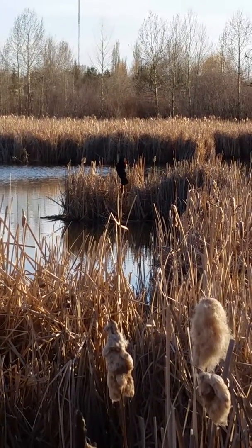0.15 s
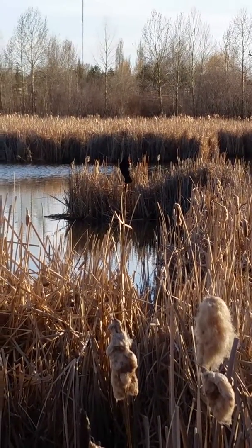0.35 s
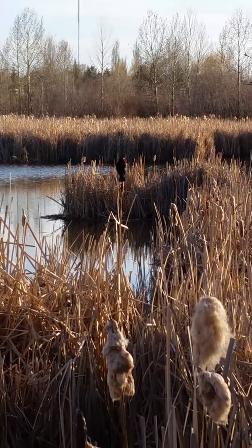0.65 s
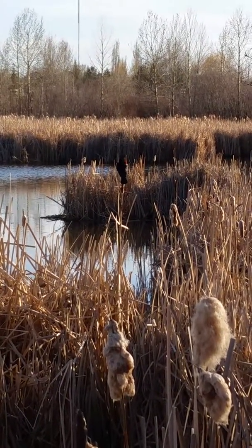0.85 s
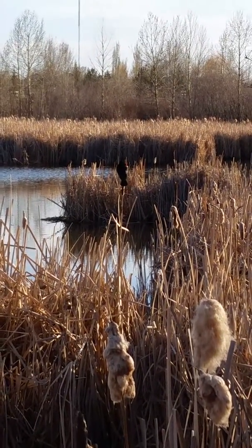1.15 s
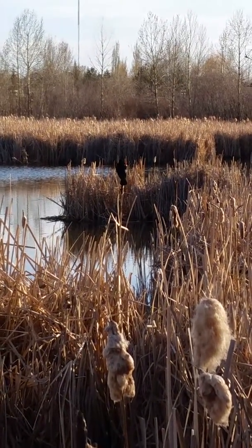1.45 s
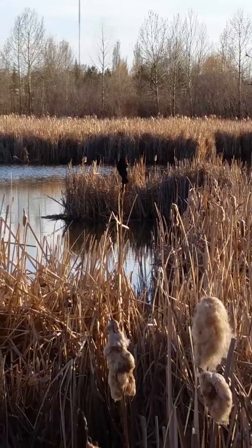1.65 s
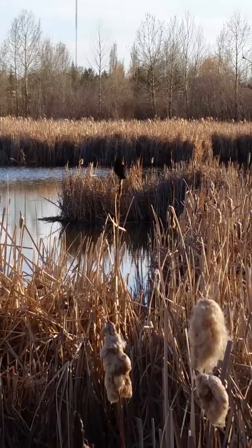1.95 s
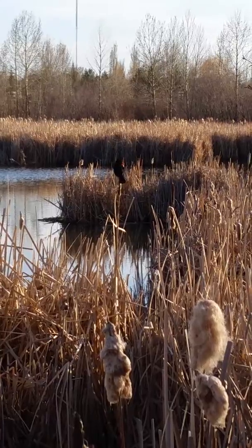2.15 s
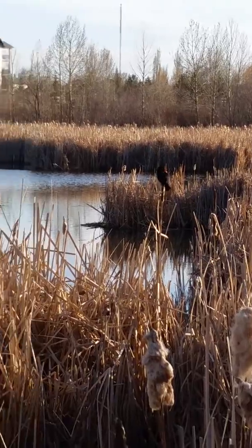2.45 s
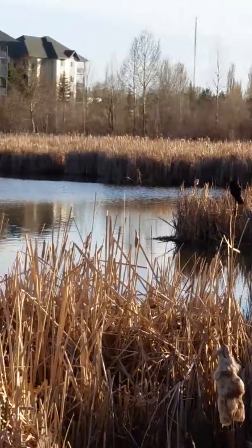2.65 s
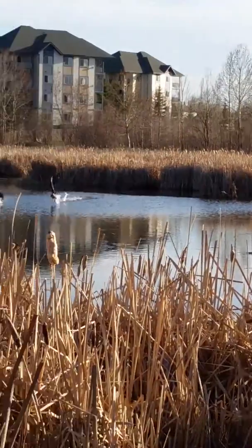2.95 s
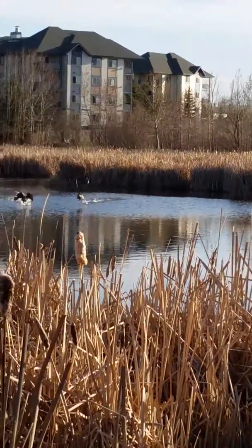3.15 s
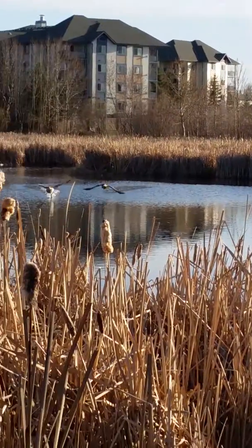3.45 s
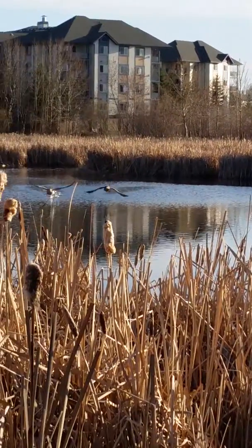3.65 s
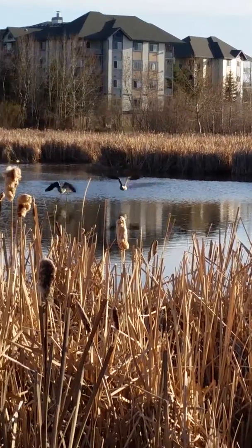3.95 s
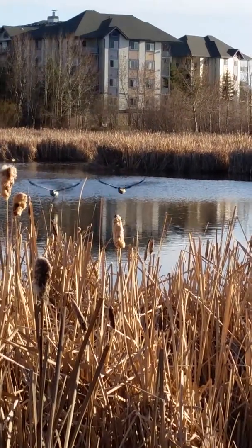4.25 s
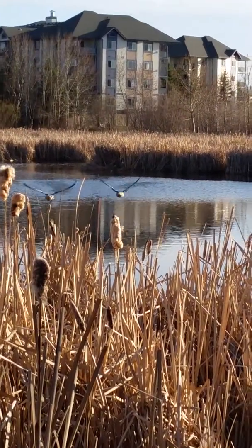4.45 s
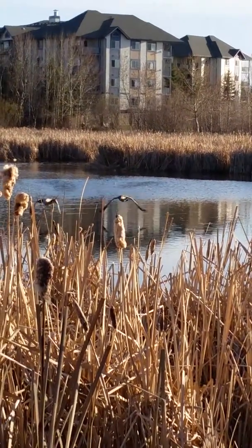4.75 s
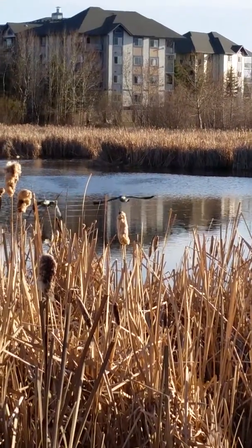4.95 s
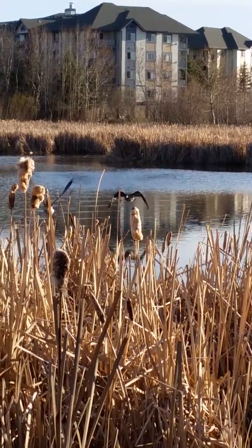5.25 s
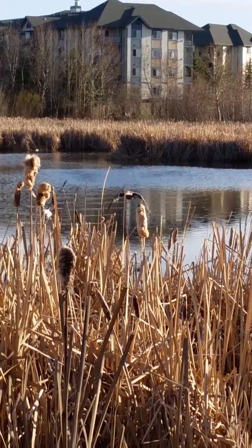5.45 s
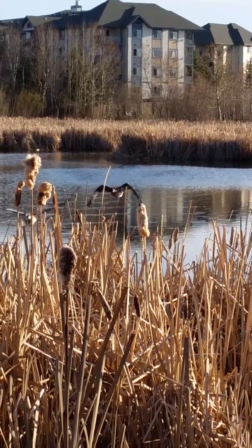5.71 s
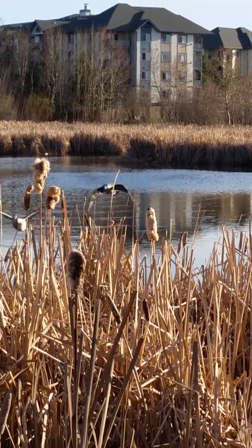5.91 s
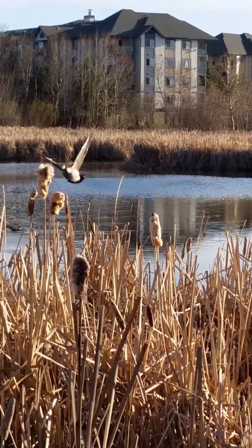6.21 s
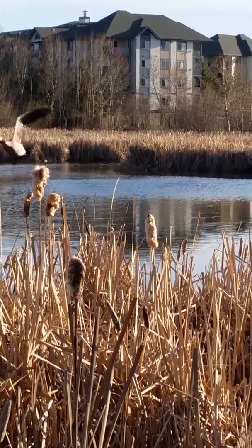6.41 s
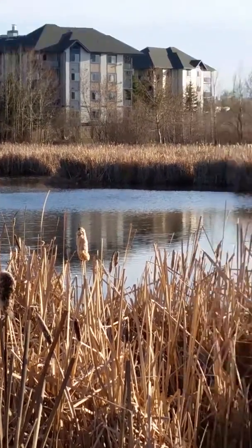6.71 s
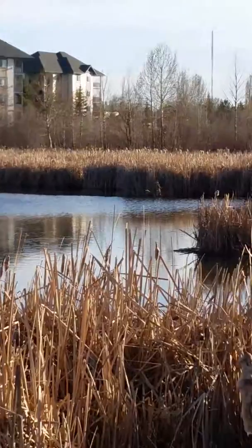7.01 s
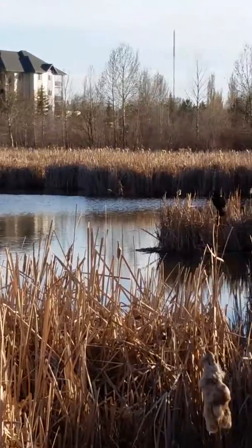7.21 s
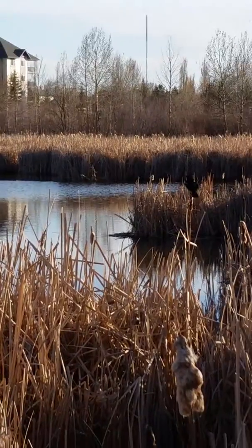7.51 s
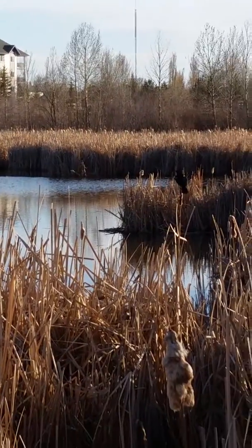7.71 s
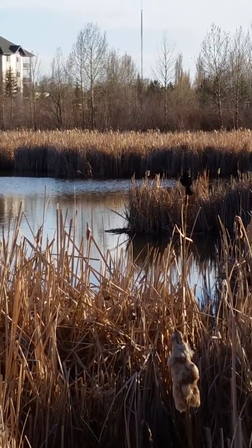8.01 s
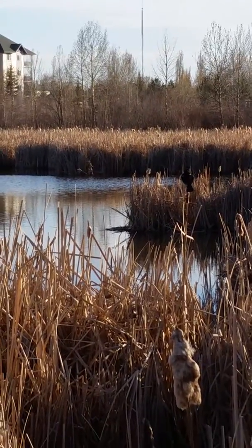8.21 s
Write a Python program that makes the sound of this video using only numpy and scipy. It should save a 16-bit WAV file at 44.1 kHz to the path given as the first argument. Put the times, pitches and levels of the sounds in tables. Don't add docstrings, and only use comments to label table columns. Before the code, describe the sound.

Outdoors at a reed-fringed pond, a low far-off traffic drone runs throughout. One goose honks steadily, faint at first, each later call often led by a rising chirp and rough croak. Its mate fills the gaps with short low grunts. The pair flies close past the microphone near the end, honks turning loud and brassy, then duller, with soft dull echoes from reeds and walls.

```python
import sys
import numpy as np
from scipy import signal
from scipy.fft import rfft, irfft, next_fast_len
from scipy.io import wavfile
from scipy.ndimage import map_coordinates

SR = 44100
rng = np.random.default_rng(int(sys.argv[2]) if len(sys.argv) > 2 else 0)


def magnitude_from_level(level_db):
    exponent = np.asarray(level_db, float) / 20
    return 10 ** exponent


def generate_wav(signal):
    frames = np.transpose(np.atleast_2d(signal))
    scaled = np.clip(frames, -1, 1) * 32767
    pcm = np.round(scaled).astype(np.int16)
    wavfile.write(sys.argv[1], SR, pcm)


N = 369116

# t/s, swell level/dB, engine load/dB
TRAFFIC = [(0, -48.5, -6), (.6, -49.5, -2), (1.44, -51, -16), (1.75, -46, 3.5), (2.2, -48, 0.5),
           (3.03, -47, -8), (3.47, -46.5, -17), (4.15, -46.5, 2.5), (4.73, -45.5, 5.5), (5.8, -44, 7),
           (6.62, -43, 8), (7.0, -41.5, 6.5), (7.74, -43, 9), (8.37, -43.5, 14.5)]
# f/Hz, level/dB per Hz
RUMBLE = [(12, -53), (20, -3), (76, 2), (172, -11), (229, -8), (317, -15.5), (450, -21.5), (580, -47),
          (990, -120)]
# f/Hz, level/dB per Hz
HISS = [(300, -0.5), (476, -8.5), (680, -7), (940, -11.5), (1370, -9), (1750, -20), (2300, -21.5),
        (3000, -17), (3700, -19.5), (4300, -29.5), (5000, -36), (6500, -38), (8200, -49), (10200, -49),
        (12000, -36.5), (16000, -36.5)]
# f/Hz, width/Hz, level/dB
DRONES = [(52.5, 7.62, -13), (95.5, 6.5, -11.5), (131.1, 6.32, -13.5)]
# f/Hz, likeness/1
LIKENESS = [(60, 0.99), (290, 0.86), (640, 0.5), (1410, 0.44), (3100, 0.039), (15000, .02)]
# f/Hz, left over right/dB
LEAN = [(60, -1), (300, -1.5), (1000, -0.5), (2400, 8), (4400, 4), (15000, 4)]
TYRES_DB, TYRES_FOLLOW = -43, 0.94
MID_AIR_FOLLOWS, AIR_FOLLOWS = 0.4, 0.65

# t/s, length/s, f/Hz, effort level/dB, sag/(Hz per s)
HONKS = [(0.145, 0.094, 670, -48, 153), (0.559, 0.072, 682.5, -48, 311), (1.019, 0.095, 676.5, -48, 47),
         (1.444, 0.11, 678, -49, 59), (1.763, 0.13, 711.7, -46.5, -300), (2.12, 0.09, 751.5, -42, 31),
         (2.501, .12, 757.6, -39.5, 130), (2.906, 0.13, 759, -41, 252), (3.311, 0.12, 755, -39, 212),
         (3.748, 0.12, 772, -40.5, 181), (4.185, 0.12, 788, -39, 162), (4.604, 0.12, 797, -39, 447),
         (5.032, 0.16, 806, -45, 667), (5.561, .158, 776.7, -46.5, 78), (6.052, 0.16, 799, -41, 562),
         (6.581, 0.16, 784.6, -27.5, 291.5), (7.039, 0.14, 765.6, -23.5, -43),
         (7.483, .13, 751, -25.5, 120), (8.121, 0.08, 713, -35, 300), (8.246, 0.059, 712, -39.5, 254)]
# onset f/Hz, late lift f/Hz, share of pitch lost at the end/1
BENDS = [(-39, 2.6, 0.17), (-42, 2.2, 0.14), (-30, 2.3, 0.22), (-41, 1.6, 0.19), (-14, 5, 0.24),
         (-23, 12.7, 0.12), (19, 2.2, 0.12), (16.5, 5.6, 0.17), (20.5, 2.7, 0.23), (15, 2.5, 0.14),
         (24.5, 3.3, 0.11), (3, 4.8, 0.126), (-10, 57, 0.15), (29.5, 1.5, 0.071), (25.5, 48, 0.09),
         (33, 22, 0.051), (-10.5, 3.5, 0.22), (10, 16.2, .2), (-28, 5.3, 0.18), (16, 2.5, 0.22)]
# first overtone/dB, second/dB, 3-8 kHz/dB, above 8 kHz/dB
HEAD_TURN = [(1, 6, -3.5, -37), (0, 6, 0, -28), (-1, 4.5, -1.5, -26), (0, 5, -1.5, -50),
             (-2.5, 2, -4.5, -30), (-9.5, -1.5, -3.5, -11), (-8, -2.5, -4.5, -9), (-6.5, -2.5, -4.5, -13),
             (-7, -2.5, -8, -15.5), (-9, -1, -13, -7), (-4.5, -1, -3, -3), (-3.5, -2, -2, -2),
             (2.5, 4.5, 5, 0.5), (5, -0.5, 5, 6), (-11.5, 7.5, -2, -3.5), (-14, -3, -0.5, 5.5),
             (-6, -5.5, 2.5, 0.5), (-4.5, -1.5, 3.5, 6.5), (-6.5, 3.5, -25, -40), (0.5, -0.5, -2.5, -33)]
# fade of the top/(dB per s), hiss level where the voice breaks/dB
TOP_FADES = [(-5, -32), (-3, -27), (-5, -25), (0, -21), (-2, -24), (-8, -20), (-10, -22), (-3, -23),
             (-4, -18), (-5, -24), (-4, -27), (2, -24), (4, -20), (-29, -19), (-23.5, -16), (-34, -13.5),
             (-17.5, -18), (-47, -8), (-18, -26), (-12, -29)]
# third overtone/dB, fourth/dB, fifth/dB, near 8.5 kHz/dB
OVERTONE_TURN = [(1.5, -3, 1, 6), (0.5, -5, 0, 3), (0.5, 0.1, -4, 5), (1, -2, -1.5, 0.1),
                 (-0.5, 8, -2, 0.1), (-1, 8, 1, 0.1), (-2, 3, 1, 0.1), (-1, 3, 0, 1), (-2, 3, 2, 0.1),
                 (-1, 5, 1, 2), (0, -6, -18, 3), (-4, -18, -14, -1), (-1, -17, -8, -6), (-3, -5, 2, 0),
                 (-7, -3, -1.5, -3), (-1.8, -4, -2.5, -5.5), (-2.2, -2.5, -7.5, 9), (2, 0.5, -0.2, -4),
                 (1, -1, 2, 2), (0, 2, 14, -6)]
UPPER_TILT_DB = [1, 3, 5, 4, -2, -3, 2, -2.5, -1, -3, 9, 7, 1.5, -13, -6.5, -1.5, -4.5, -5, -6, -7]
# f/Hz,
# level/dB
HONK_COLOUR = [(650, 15), (1500, 11), (1900, 7.5), (2300, 4), (3080, -5.5), (3850, 3.5), (4620, 1.5),
               (5400, 0), (6200, -3.5), (7700, -15.5), (9500, -18), (11100, -11.5), (12500, -1),
               (14500, -5.5), (15800, -8)]
HONK_ATTACK_S, HONK_RELEASE_S = 0.016, 0.0346
ONSET_DB, HOLD_FADE_DB_PER_S, END_DB = -6.5, -20.5, -6.5
SETTLE_S, LIFT_BEFORE_END_S, LIFT_WIDTH_S = 0.014, 0.0445, 0.018
TOP_LATE_S, TOP_LATE_DB = 0.015, -27
WOBBLE, HONK_SHIMMER_DB = 0.0037, 1.2
HONK_AIR_DB, HONK_GRAIN_DB = -31, -44
PASSED_S, PASSED_AIR_DB = 7.4, 13.5
FLARE_DB = 19.5

# t/s, length/s, start level/dB, end level/dB
CROAKS = [(0.502, 0.076, -56, -44.5), (2.088, 0.051, -60.5, -42), (2.471, 0.045, -46.5, -48),
          (2.862, 0.065, -57, -43.5), (3.277, 0.081, -49, -48), (3.709, 0.072, -48.5, -44),
          (4.58, 0.03, -58, -36.5), (4.997, 0.061, -57, -44), (5.51, 0.072, -69, -40),
          (5.99, 0.078, -55, -37), (6.539, 0.06, -53, -28.5), (6.993, 0.066, -43, -29),
          (7.453, 0.059, -29.5, -31), (8.048, 0.092, -38, -28)]
# t/s, length/s, start level/dB, end level/dB
LAST_CROAK = [
    (8.175, .092, -31, -36),
]
# f/Hz, level/dB
CROAK_THROAT = [(177, 1.5), (330, -24), (520, 2), (780, -3.5), (1060, 2), (1330, 2.5), (1800, -13),
                (2500, -18.5), (4000, -26), (7000, -71.5), (9500, -85), (13000, -75)]
# f/Hz, level/dB
LAST_CROAK_THROAT = [(250, -36), (500, -5), (750, -4), (1000, -0.5), (1250, -6), (2000, -17), (4000, -23.5),
                     (9000, -98)]
# t/s, length/s, start f/Hz, end f/Hz, level/dB
LOW_NOTES = [
    (5.525, 0.061, 496, 555, -42.5),
    (5.99, 0.076, 559, 545, -50.5),
    (6.54, 0.059, 508, 520, -38.5),
    (8.102, 0.054, 490, 493, -35),
    (8.172, 0.097, 496.6, 511, -28),
]
# f/Hz, level/dB
LOW_NOTE_THROAT = [(500, -2.5), (1000, -12)]
# t/s, length/s, peak level/dB, scoop/s
CHIRPS = [(0.97, 0.069, -49, 0.035), (2.075, 0.042, -38.5, 0.02), (2.453, 0.087, -40.5, 0.036),
          (2.841, 0.13, -39, 0.044), (3.246, 0.099, -36.5, 0.054), (3.694, 0.047, -39.5, 0.033),
          (4.136, 0.059, -35, 0.055), (4.555, 0.065, -33.5, 0.04), (4.983, 0.087, -34, 0.041),
          (5.517, 0.027, -37.5, 0.049), (5.985, 0.027, -47, 0.05), (6.528, 0.028, -25.5, 0.043),
          (6.974, 0.073, -32, 0.046), (7.429, 0.049, -21.5, 0.074), (8.019, 0.085, -25.5, 0.063)]
# f/Hz, level/dB
CHIRP_THROAT = [(700, -1), (1390, -3), (1540, -11.5), (2050, -14.5), (4000, -72.5)]

# t/s, length/s, f/Hz, level/dB
GRUNTS = [(.165, 0.047, 170.2, -55), (0.79, .048, 173.4, -51), (1.108, 0.044, 172, -50),
          (1.319, 0.041, 173.2, -50.5), (1.542, 0.035, 175.4, -50), (1.707, 0.063, 179.4, -49.5),
          (1.924, 0.043, 191.5, -46), (2.126, 0.046, 194.2, -53), (2.346, 0.041, 196.6, -50),
          (2.551, 0.078, 201.2, -50.5), (2.945, 0.054, 198.2, -49), (3.35, 0.058, 204, -48),
          (3.531, 0.071, 202.3, -48), (3.765, 0.04, 210.4, -45), (3.936, 0.0553, 204.6, -48),
          (4.13, 0.075, 205.6, -46.5), (4.358, 0.08, 205.6, -47), (4.62, 0.051, 210.4, -47),
          (4.865, 0.05, 208.8, -46), (5.124, 0.0654, 204.6, -47), (5.348, 0.053, 205.6, -47),
          (5.667, 0.088, 206.7, -48), (5.852, 0.055, 208.8, -46), (6.129, 0.075, 211.3, -43.5),
          (6.361, 0.061, 209.6, -43), (6.691, 0.083, 207.2, -35.5), (6.925, 0.069, 205, -38.5),
          (7.187, 0.068, 206.8, -37), (7.402, 0.086, 202.5, -34.5)]
# t/s, length/s, f/Hz, level/dB
HIGH_GRUNTS = [
    (2.739, 0.041, 273.5, -55.5),
    (3.127, 0.045, 276.5, -51),
    (7.81, 0.053, 269.2, -39.5),
]
# third overtone/dB, fourth/dB, fifth and sixth/dB
GRUNT_TURN = [(0, -4, -1), (-7, 6.5, -2.5), (-9, 6, -7), (-7, 4, -4), (-4, 0.5, -6), (-5, 4, -3),
              (-7, 3.5, -12), (-3, -5, -6), (-5, 5, -10), (-1.5, 2.5, -3), (-5.5, 2, -1.5),
              (-1.5, -0.5, -4), (-3, 2, -3), (.3, 5.5, -4), (-4, 2, -5), (-1.5, -1, -2), (-1.5, 2, -5),
              (2, 4, 2), (-1, 4, 1), (1, 3, -8), (3.5, 6, -10), (1, 0, -18), (2, -10, -19), (-8, 6.5, 3),
              (-3, 2, 1), (-4, 8, -4), (-1, 2, 1.5), (-6.5, 3.7, 2.5), (-6, 3, 6), (3, -1, 2), (3, -9, -1),
              (4.3, -1, 2.8)]
# overtone number/1, level/dB
GRUNT_THROAT = [(1, -5), (2, -30.5), (3, 3.5), (4, 4), (5, -4.5), (6, -4), (7, 4.5), (8, 7), (9, -12.5),
                (12, -14.5), (20, -26.5), (26, -32.5), (33, -38), (45, -53), (63, -36.5)]
# overtone number/1, level/dB
HIGH_GRUNT_THROAT = [(1, -56), (2, 0), (3, -2), (4, -3), (5, 5.5), (6, 0), (7, -16), (14, -25), (30, -59)]
# t/s, middle overtones/dB, top/dB, left over right/dB
GRUNT_LEAN = [(0, 5, 0, -2), (1.5, 1, -5, -3), (2.2, -4, -7, -3), (4.0, -6, -10, -1.5), (5.35, -7, -2, -2),
              (5.7, -5.5, 0.5, -1), (5.85, 1, -5, -1), (6.15, -6.5, -2.5, -1.5), (6.4, -6.5, -10.5, -3),
              (6.72, -2.5, 8, -4.5), (6.95, -5, -2.5, -2), (7.2, -8.5, 2.5, -3), (7.42, -7, 0.5, -4),
              (8.37, -9, 1, -4)]
GRUNT_DULLING_DB = -2
GRUNT_SWELL_S = 0.022

# t/s, right port lag/ms, left over right/dB, treble carried/dB
FLIGHT = [(0, 0.016, 2.5, -12), (4, 0.0011, 1.5, -17), (6.3, 0.022, 1, 3.5), (6.6, 0.018, 4, -5.5),
          (7.05, 0.053, 2, -9), (7.5, 0.15, 2, -24), (8.37, 0.2, -4, -45)]
# f/Hz, left over right/dB
PORTS = [(700, 1.5), (1500, 6.5), (2300, -10), (3100, 11), (4000, -33.5), (6000, -27), (7200, -12),
         (9000, 7), (11000, 17), (15000, -5)]
# delay/s, level/dB
ECHOES = [(0.019, -13), (.062, -23), (0.101, -23), (0.136, -17.5), (.215, -31.5), (.31, -34.5)]
# t/s, level/dB
ECHO_SHARE = [(0, 0.5), (2, 1), (6, -.5), (7.5, -5), (8.37, -2.5)]
ECHO_THIN_HZ, ECHO_BRIGHT_DB = 900, -15
ECHO_FLUTTER_DB = 3.5

# t/s, peak level/dB
TICKS = [(1.567, -60), (6.535, -59), (6.55, -62.5), (6.568, -62), (6.747, -31), (6.761, -30), (6.778, -33),
         (6.968, -60), (6.985, -67)]
# t/s, level/dB
CHIPS = [
    (3.012, -52.5),
    (5.321, -59),
]
# delay/s, length/s, start f/Hz, end f/Hz, level/dB
CHIP_NOTES = [
    (0, 0.0077, 4020, 3800, 4.5),
    (.006, .009, 3200, 3320, 6),
    (.014, .006, 5600, 4600, 0.5),
]
# t/s, level/dB
IDLE_NOTE = [
    (2.2, -80),
    (2.45, -57),
    (3.15, -57),
    (3.4, -80),
]
# t/s, firing rate f/Hz, upper orders level/dB, lower orders level/dB
PASSING_HUM = [(2.7, 27.7, -76, -80), (3.1, 28.0, -65, -80), (4.1, 28.7, -64, -80), (4.95, 29.6, -73, -80),
               (5.1, 27.4, -72, -74), (5.75, 26.6, -65, -66), (6.3, 26.8, -68, -57), (7.3, 27.0, -60, -56),
               (7.8, 27.4, -63, -54), (8.37, 27.95, -58, -52)]
# multiple of firing rate/1, level/dB
HUM_ORDERS = [(8, -3), (9, 0.5), (10, -6), (11, -13), (13, -3), (14, 0.5), (15, -9), (16, -9)]


def at_hz(points, hz):
    points_hz, level_db = np.array(points).T
    return np.interp(np.log(hz), np.log(points_hz), level_db)


def rms_one(x):
    return x / np.sqrt(np.mean(x ** 2) + 1e-20)


def in_time(rows):
    s, *columns = np.transpose(rows)
    return [np.interp(np.arange(N) / SR, s, c) for c in columns]


def drift(rate_hz, size=N):
    r = np.exp(-2 * np.pi * rate_hz / SR)
    noise = rng.standard_normal(size + SR // 2)
    return rms_one(signal.lfilter([1], [1, -2 * r, r * r], noise)[SR // 2:])


def add(out, start_s, sound, attack_s, release_s):
    t = np.arange(len(sound)) / SR
    ends = np.clip(t / attack_s, 0, 1) * np.clip((t[-1] - t) / release_s, 0, 1)
    i = round(start_s * SR)
    out[i:i + len(t)] += (sound * ends)[:N - i]


def traffic():
    rumble_db, drone_db = in_time(TRAFFIC)
    swell_db = rumble_db - rumble_db.mean()
    hiss_db = TYRES_DB + TYRES_FOLLOW * swell_db
    edges = np.minimum(16 * 2 ** np.arange(0, 10.6, .5), 19000)
    size = next_fast_len(N)
    bins_hz = np.fft.rfftfreq(size, 1 / SR) + 1
    colour = magnitude_from_level(np.where(bins_hz < 400, at_hz(RUMBLE, bins_hz), at_hz(HISS, bins_hz) - 14))
    coloured = irfft(rfft(rng.standard_normal((2, 2, size))) * colour, size)[..., :N]
    low, high = 0, 0
    for k, (a, b) in enumerate(zip(edges, edges[1:])):
        band_pass = signal.butter(2, [a, b], "band", fs=SR, output="sos")
        mid, side = signal.sosfilt(band_pass, coloured[k % 2])
        hz = np.sqrt(a * b)
        alike = np.clip(at_hz(LIKENESS, hz), 0, 1)
        pair = np.sqrt(1 + alike) * mid + np.sqrt(1 - alike) * side * [[1], [-1]]
        follows = AIR_FOLLOWS * (hz > 9000) + MID_AIR_FOLLOWS * (4200 < hz < 9000)
        lean_db = at_hz(LEAN, hz) * np.array([[.5], [-.5]])
        band = magnitude_from_level(1.4 * drift(3) + follows * swell_db + lean_db) * pair
        if hz < 400:
            low = low + band
        else:
            high = high + band
    scale = np.sqrt(np.mean(low ** 2))
    drones = 0
    for hz, width_hz, level_db in DRONES:
        wander = 2 * np.pi * np.cumsum(hz + width_hz * 0.371 * drift(1.53)) / SR
        drones = drones + magnitude_from_level(level_db + 2.7 * drift(4.2)) * np.sqrt(2) * np.sin(wander)
    return magnitude_from_level(rumble_db) * (low / scale + magnitude_from_level(drone_db) * drones) + magnitude_from_level(hiss_db) * high / scale


def voice(pitch_hz, throat, jitter, rasp, turn_db=0, shimmer_db=-2.0, count=None):
    size = len(pitch_hz)
    order = np.arange(1, (count or int(15800 / pitch_hz.max())) + 1)[:, None]
    phase = 2 * np.pi * np.cumsum(pitch_hz * (1 + jitter * drift(87, size=size))) / SR
    knots = rng.standard_normal((len(order), size // 900 + 2))
    flicker = np.array([np.interp(np.arange(size) / 900, np.arange(len(row)), row) for row in knots])
    wavering_db = shimmer_db * flicker * np.log(order)
    gain_db = at_hz(throat, order * pitch_hz) + turn_db + wavering_db
    tone = (magnitude_from_level(gain_db) * np.cos(order * phase + order ** 2 * .3)).sum(0)
    return tone * (1 + rasp * drift(260, size=size))


def breath(throat, size):
    colour = magnitude_from_level(at_hz(throat, np.fft.rfftfreq(size, 1 / SR) + 1))
    return rms_one(irfft(rfft(rng.standard_normal(size)) * colour, size))


def honk_shape(length, pitch_hz, effort_db, sag, onset_hz, lift_hz, end_drop):
    t = np.arange(int(length * SR)) / SR
    rising = np.clip(1 - t / HONK_ATTACK_S, 0, 1)
    failing = np.clip(1 - (length - t) / HONK_RELEASE_S, 0, 1)
    lift = np.exp(-((length - LIFT_BEFORE_END_S - t) / LIFT_WIDTH_S) ** 2)
    held_hz = pitch_hz - sag * t + onset_hz * np.exp(-t / SETTLE_S) + lift_hz * lift
    level_db = effort_db + ONSET_DB * rising + HOLD_FADE_DB_PER_S * t + END_DB * failing ** 1.5
    return held_hz * (1 - end_drop * failing ** 1.86), level_db


def slack_voice(start, pitch_hz, effort_db, fade_db):
    order = np.arange(1, 21)[:, None]
    t = np.arange(len(pitch_hz)) / SR
    sagging = np.minimum(pitch_hz / np.median(pitch_hz) - .98, 0)
    slack = np.log(order) * .3 * (effort_db - effort_db.max())
    slack += np.log(np.maximum(order / 2.5, 1)) * 230 * sagging
    late_db = TOP_LATE_DB * np.clip(1 - t / TOP_LATE_S, 0, 1) ** .5
    slack += (fade_db * t + late_db) * np.log(np.maximum(order / 2.9, 1))
    flare = np.interp(t[-1] - t, [0, .03, .04, .06], [2, .6, -1, 0])
    return slack + FLARE_DB * (PASSED_S < start < 8) * (order == 5) * flare


def honks(out):
    thin_hiss = signal.butter(5, 10500, "high", fs=SR, output="sos")
    puff_throat = [(2500, -40)] + HONK_COLOUR[4:] + [(16000, -44)]
    grain_throat = [(3000, -40), (4200, 0), (6500, -3), (8000, -30)]
    order = np.arange(1, 21)[:, None]
    calls = zip(HONKS, BENDS, HEAD_TURN, TOP_FADES, OVERTONE_TURN, UPPER_TILT_DB)
    for (start, *row), bend, head, (fade_db, break_db), (third, fourth, fifth, gap), tilt in calls:
        first, second, bright, top = head
        pitch_hz, effort_db = honk_shape(*row, *bend)
        size, peak_db = len(pitch_hz), effort_db.max()
        turn = np.interp(order, [1, 2, 3, 4, 5, 6, 9, 11, 13, 15],
                         [first, second, third, bright + fourth, bright + fifth, bright,
                          bright + tilt, top + gap, top + gap / 2, top])
        balance_db = turn + slack_voice(start, pitch_hz, effort_db, fade_db)
        held_hz = pitch_hz * (1 + WOBBLE * drift(14, size=size))
        clear = voice(held_hz, HONK_COLOUR, .0013, .035, balance_db, shimmer_db=HONK_SHIMMER_DB, count=20)
        grain_db = HONK_GRAIN_DB + 20 + bright + .6 * (effort_db - peak_db)
        clear += magnitude_from_level(grain_db) * breath(grain_throat, size)
        add(out, start, magnitude_from_level(effort_db - 10.5) * clear, .006, .008)
        air = rms_one(signal.sosfilt(thin_hiss, rng.standard_normal(size)))
        air_db = 1.34 * effort_db - 0.54 * peak_db + top + HONK_AIR_DB + PASSED_AIR_DB * (start > PASSED_S)
        add(out, start, magnitude_from_level(air_db) * air, .006, .008)
        puff = breath(puff_throat, int(0.035 * SR))
        add(out, start - 0.001, magnitude_from_level(peak_db + (bright + top) / 2 + break_db) * puff, .012, .01)


def croak(out, row, pulse_hz, throat, jitter, air):
    start, length, from_db, to_db = row
    level_db = np.linspace(from_db, to_db, int(length * SR))
    pulses = rms_one(voice(np.full(len(level_db), pulse_hz), throat, jitter, 0.6, shimmer_db=4.0))
    rough = rms_one(pulses + air * breath(CROAK_THROAT[1:], len(pulses)))
    add(out, start, magnitude_from_level(level_db) * rough, .012, .014)


def croaks(out):
    for row in CROAKS:
        croak(out, row, 177., CROAK_THROAT, jitter=.012, air=.45)
    for row in LAST_CROAK:
        croak(out, row, 251., LAST_CROAK_THROAT, jitter=.008, air=.42)
    for s, length, from_hz, to_hz, level_db in LOW_NOTES:
        glide_hz = np.linspace(from_hz, to_hz, int(length * SR))
        note = voice(glide_hz, LOW_NOTE_THROAT, 0.0028, .05, count=2)
        add(out, s, magnitude_from_level(level_db) * note, .012, .015)


def chirps(out):
    for s, length, peak_db, scoop_s in CHIRPS:
        t = np.arange(int(length * SR)) / SR
        pitch_hz = 655 + 190 * np.sin(np.pi / 2 * np.minimum(t / scoop_s, 1)) ** 2
        chirp = voice(pitch_hz, CHIRP_THROAT, 0.0043, 0.082, shimmer_db=4.5)
        add(out, s - .003, magnitude_from_level(peak_db - 7.0) * chirp, .003, 0.89 * length)


def caller():
    out = np.zeros(N)
    honks(out)
    croaks(out)
    chirps(out)
    return out


def mate():
    out, bearing = np.zeros(N), in_time(GRUNT_LEAN)
    for (s, length, pitch_hz, level_db), (third, fourth, fifth) in zip(GRUNTS + HIGH_GRUNTS, GRUNT_TURN):
        lean_db, top_db, _ = (c[round(s * SR)] for c in bearing)
        along = np.linspace(0, 1, int((length + .026) * SR))
        throat = []
        for number, db in GRUNT_THROAT if pitch_hz < 240 else HIGH_GRUNT_THROAT:
            bill_db = lean_db * (4.5 < number < 10) + top_db * np.log(max(number / 9, 1))
            throat.append((number * pitch_hz, db + bill_db))
        order = np.arange(1, int(15800 / (1.005 * pitch_hz)) + 1)[:, None]
        turn = GRUNT_DULLING_DB * (5 * np.abs(along - .35) + .1) * np.log(np.maximum(order / 8, 1))
        turn += third * (order == 3) + fourth * (order == 4) + fifth * ((order == 5) | (order == 6))
        sagging_hz = pitch_hz * (1.005 - .13 * along ** 2.1 - .04 * np.exp(-along / .1))
        jitter, rasp = (.0045, .09) if s < 7.6 else (.016, .3)
        grunt = rms_one(voice(sagging_hz, throat, jitter, rasp, turn, shimmer_db=1.1, count=len(order)))
        grunt += .05 * breath(throat, len(along))
        add(out, s - .010, magnitude_from_level(level_db + 6 - 2.9 * along) * grunt, GRUNT_SWELL_S, .034)
    return out


def two_ports(x, lean_share, aside_db=0):
    lag_ms, pan_db, treble_db = in_time(FLIGHT)
    pan_db = pan_db + aside_db
    low = signal.sosfiltfilt(signal.butter(2, 2800, fs=SR, output="sos"), x)
    x = low + magnitude_from_level(treble_db) * (x - low)
    size = next_fast_len(N)
    lean = lean_share * at_hz(PORTS, np.fft.rfftfreq(size, 1 / SR) + 1) / 2
    fading = np.exp(-np.arange(400) / SR / 0.006)
    scatter = magnitude_from_level(-27.5) * np.diff(rng.standard_normal((2, 402)), 2) * fading
    scatter[:, 0] = 1
    left, right = irfft(rfft(x, size) * magnitude_from_level([lean, -lean]) * rfft(scatter, size), size)[:, :N]
    right = map_coordinates(right, [np.arange(N) - lag_ms * SR / 1000], order=3)
    return np.array([left * magnitude_from_level(pan_db / 2), right * magnitude_from_level(-pan_db / 2)])


def marsh(x):
    t = np.arange(int(.9 * SR)) / SR
    shape = magnitude_from_level(-62.0 - 60 * t / 1.3) * (t > .02)
    for delay, level_db in ECHOES:
        shape += magnitude_from_level(level_db - 16.5) * np.exp(-((t - delay) / 0.0027) ** 2)
    dull = signal.sosfilt(signal.butter(5, 1750, fs=SR, output="sos"), x) + magnitude_from_level(ECHO_BRIGHT_DB) * x
    thin = signal.lfilter(*signal.butter(1, ECHO_THIN_HZ, "high", fs=SR), dull)
    sent = magnitude_from_level(in_time(ECHO_SHARE)[0] + ECHO_FLUTTER_DB * drift(24)) * thin
    shared, *own = rng.standard_normal((3, len(t)))
    tails = (0.61 * shared + .5 * np.array(own)) * shape
    return signal.fftconvolve(sent[None], tails, axes=1)[:, :N]


def small_sounds():
    out = np.zeros(N)
    bright = signal.butter(4, 12500, "high", fs=SR, output="sos")
    for s, peak_db in TICKS:
        tick = signal.sosfilt(bright, rng.standard_normal(60))
        add(out, s - .001, magnitude_from_level(peak_db) * tick, .0003, .0008)
    for s, level_db in CHIPS:
        for delay, length, from_hz, to_hz, db in CHIP_NOTES:
            glide_hz = np.linspace(from_hz, to_hz, int(length * SR))
            note = np.sin(2 * np.pi * np.cumsum(glide_hz) / SR)
            add(out, s + delay, magnitude_from_level(level_db + db) * note, length / 2, length / 2)
    return out


def passing_hum():
    hz, upper_db, lower_db = in_time(PASSING_HUM)
    turns = 2 * np.pi * np.cumsum(hz) / SR
    hum = magnitude_from_level(*in_time(IDLE_NOTE)) * np.sin(2 * np.pi * 232 * np.arange(N) / SR)
    for k, db in HUM_ORDERS:
        order_db = db + (upper_db if k > 12 else lower_db) + 1.5 * drift(2)
        hum += magnitude_from_level(order_db) * np.sin(k * turns + k ** 2)
    return np.sqrt(2) * hum


def scene():
    one, other = caller(), mate() + small_sounds()
    birds = two_ports(one, lean_share=0.45)
    birds = birds + two_ports(other, lean_share=1.0, aside_db=in_time(GRUNT_LEAN)[-1])
    return birds + marsh(one + other) + traffic() + passing_hum()


def band_limit(x):
    return signal.sosfilt(signal.butter(12, 15850, fs=SR, output="sos"), x)


def record(dry):
    thin = signal.sosfilt(signal.butter(3, 36, "high", fs=SR, output="sos"), dry)
    return band_limit(thin)


dry = scene()
out = record(dry)
generate_wav(out)
```